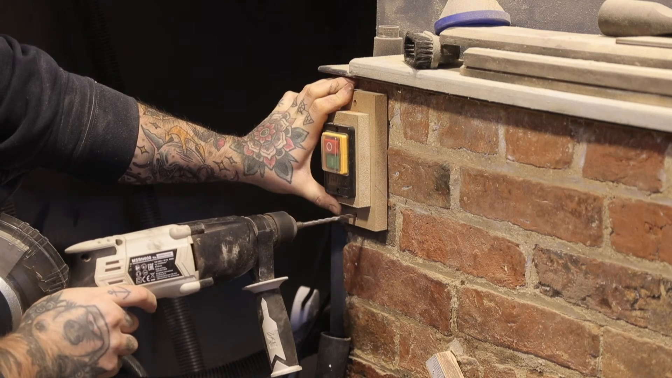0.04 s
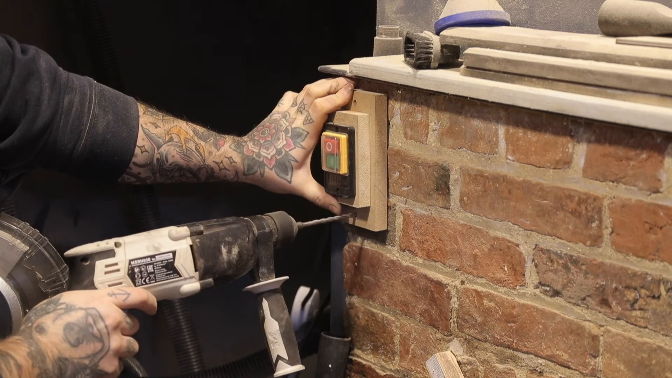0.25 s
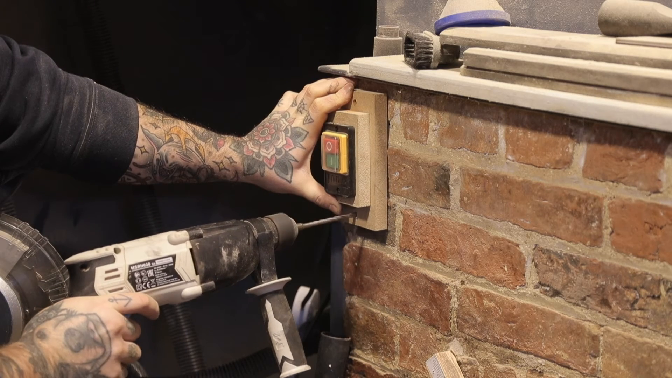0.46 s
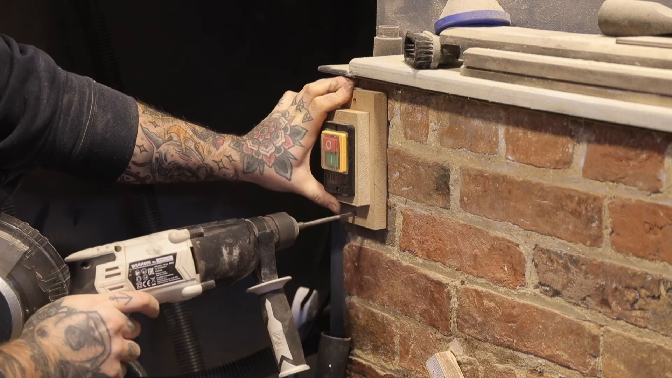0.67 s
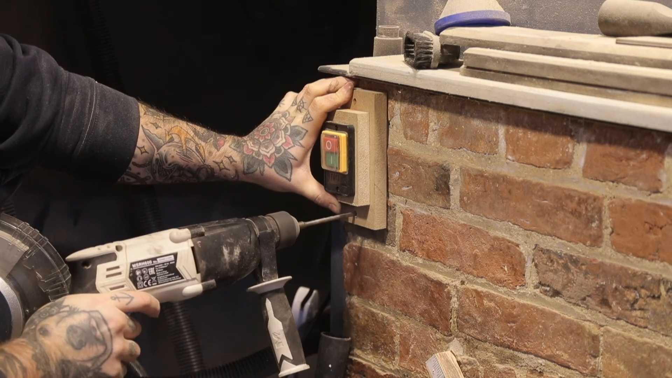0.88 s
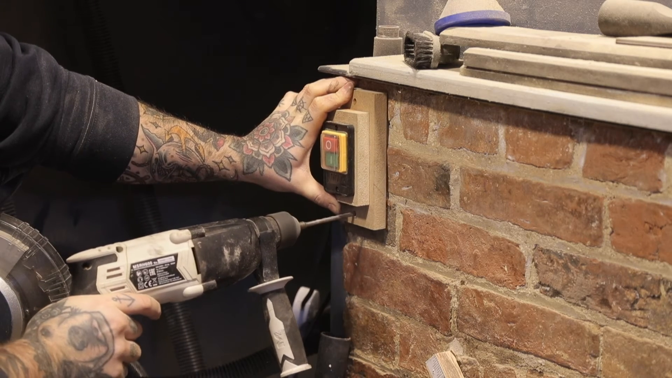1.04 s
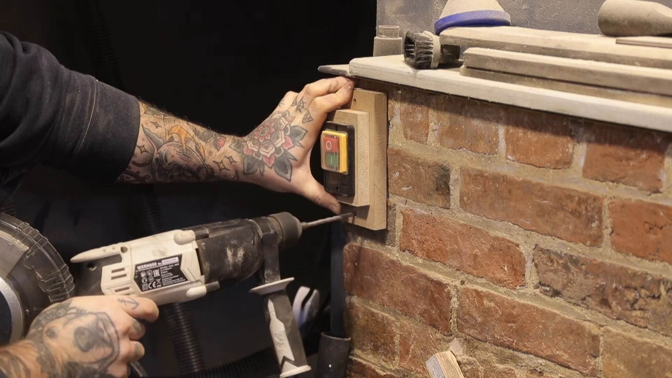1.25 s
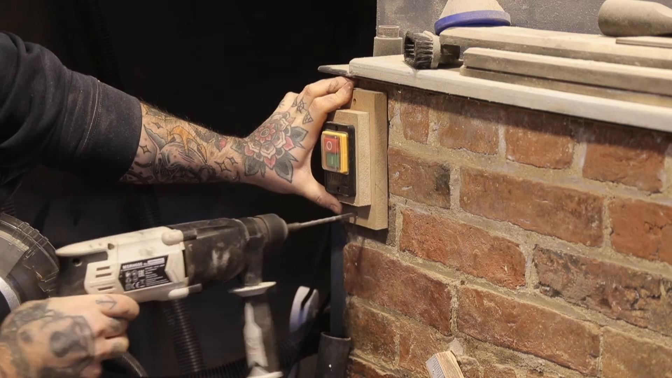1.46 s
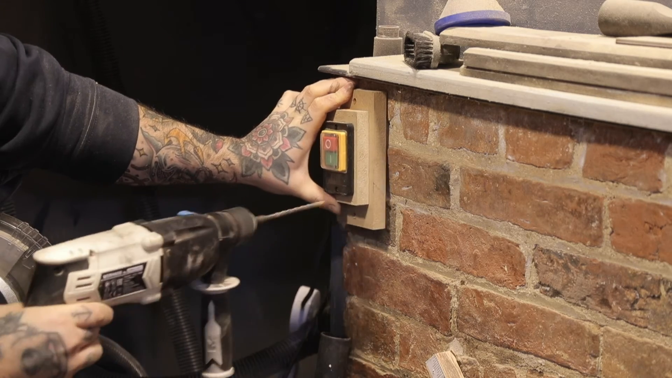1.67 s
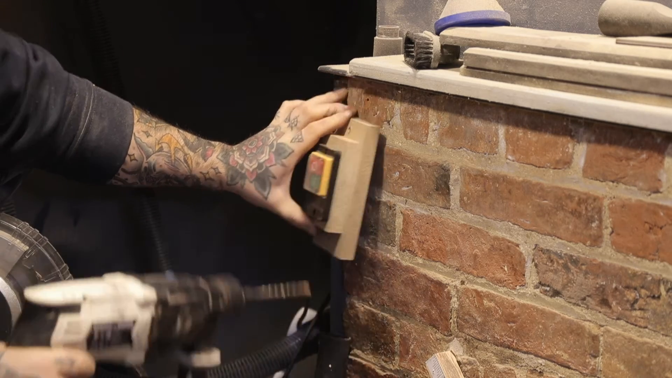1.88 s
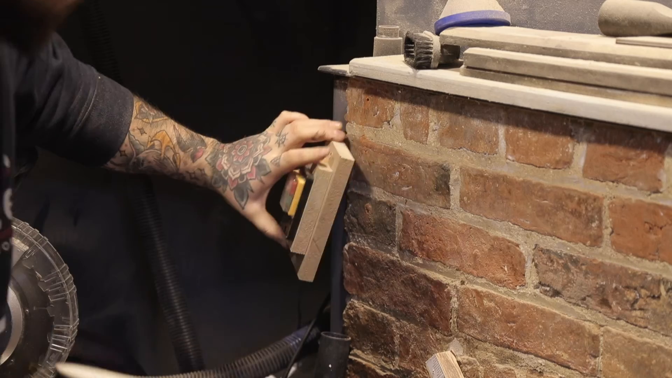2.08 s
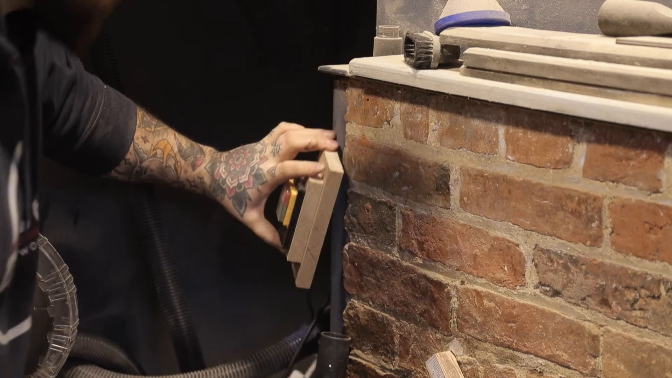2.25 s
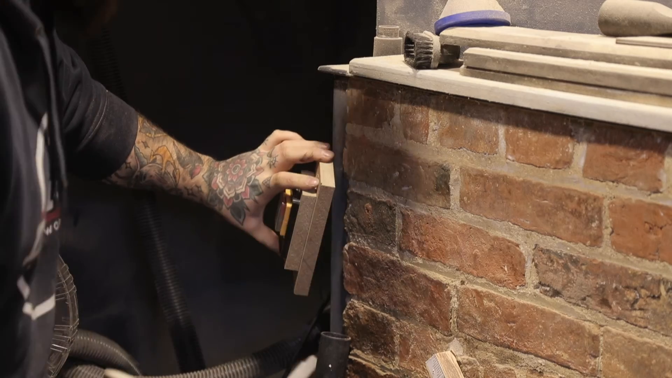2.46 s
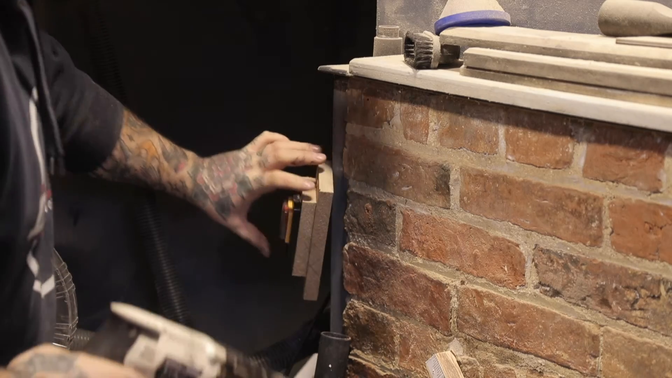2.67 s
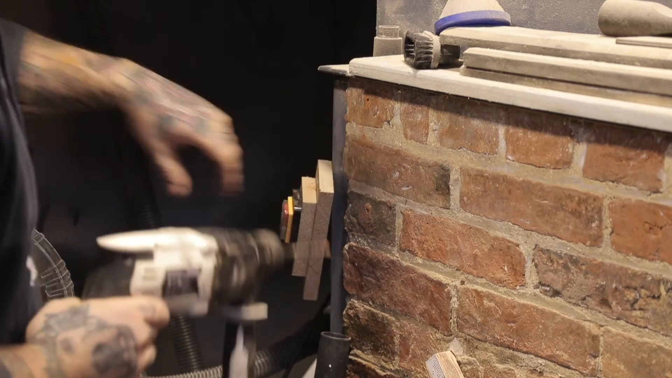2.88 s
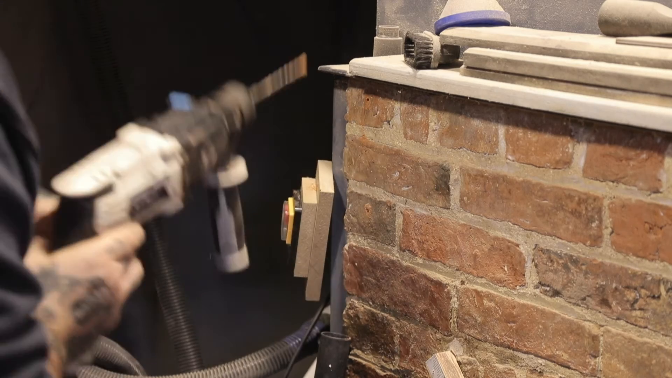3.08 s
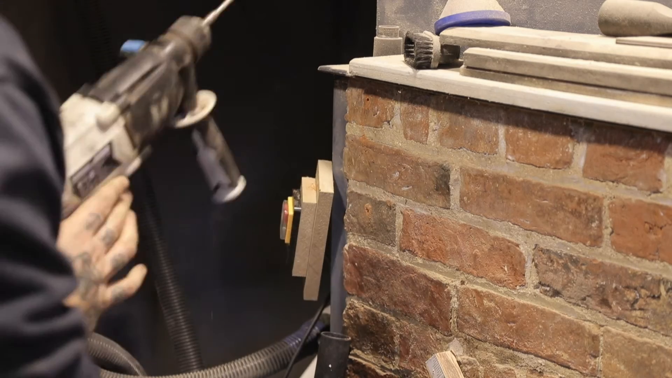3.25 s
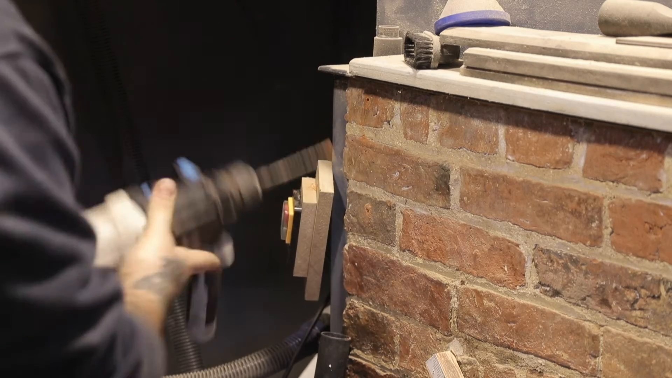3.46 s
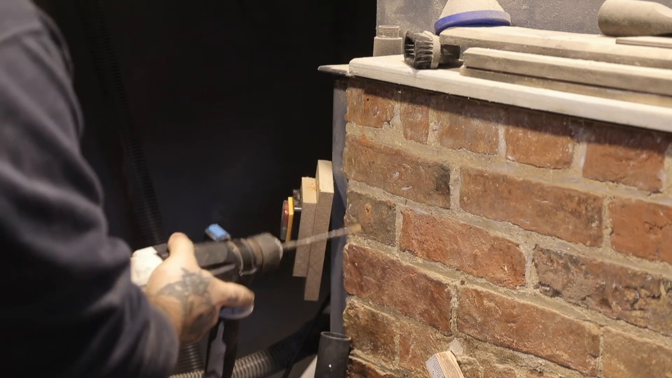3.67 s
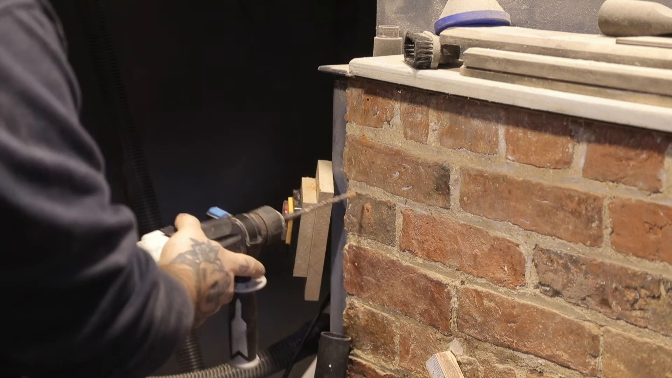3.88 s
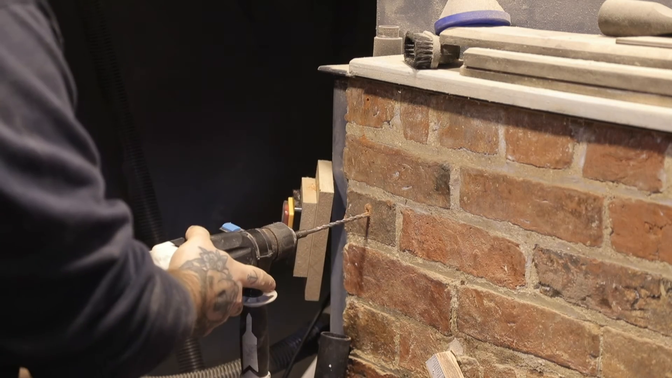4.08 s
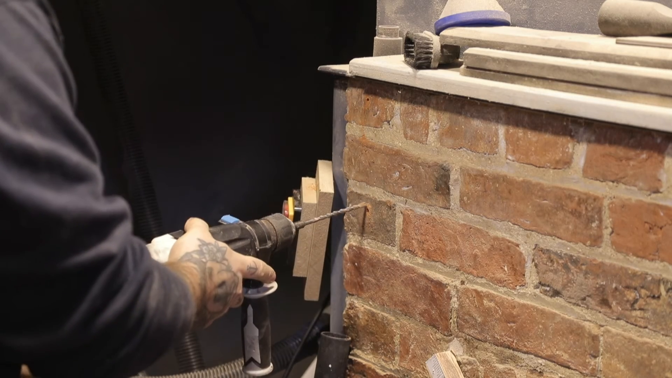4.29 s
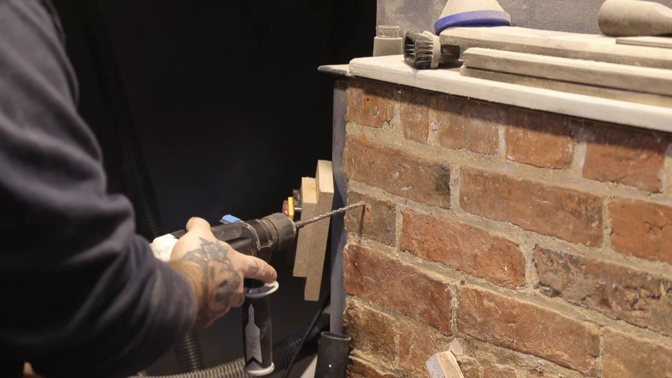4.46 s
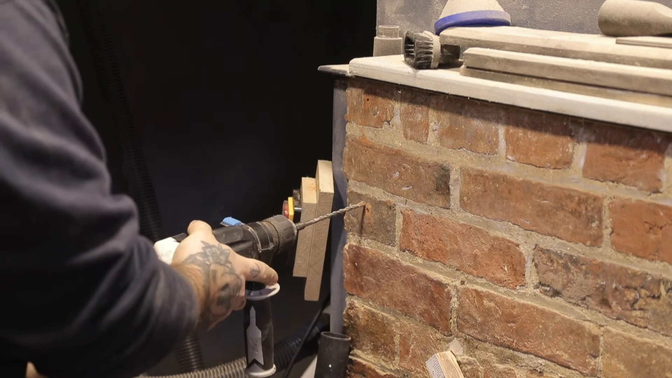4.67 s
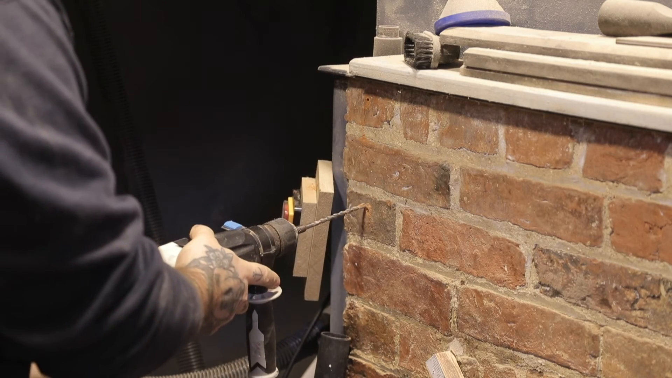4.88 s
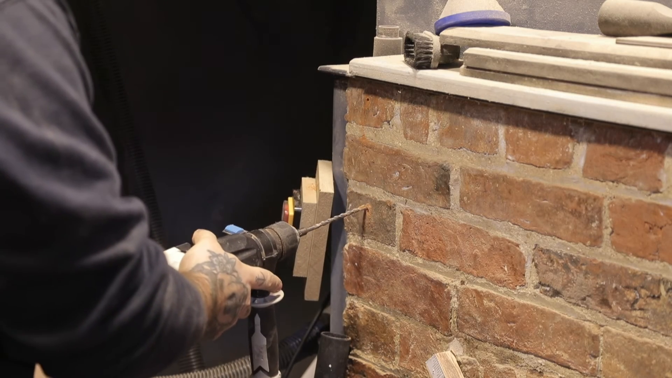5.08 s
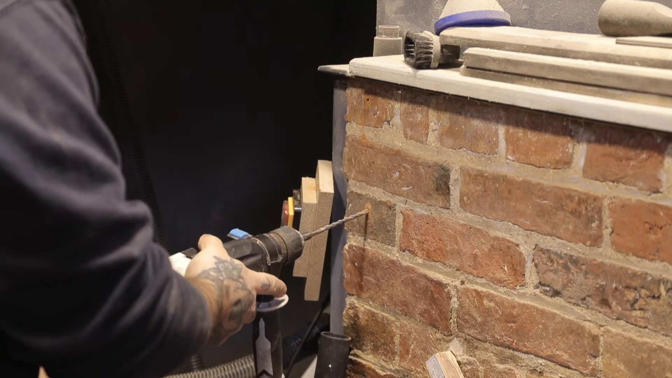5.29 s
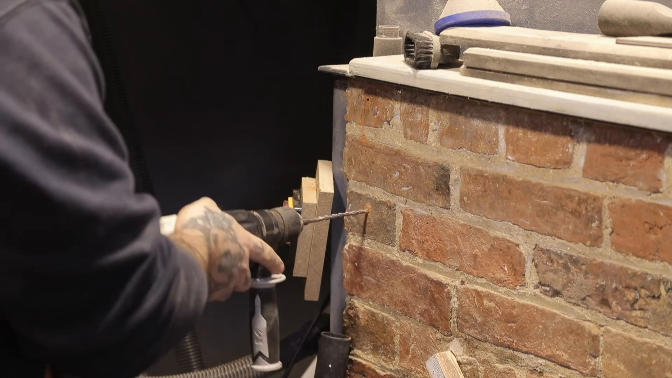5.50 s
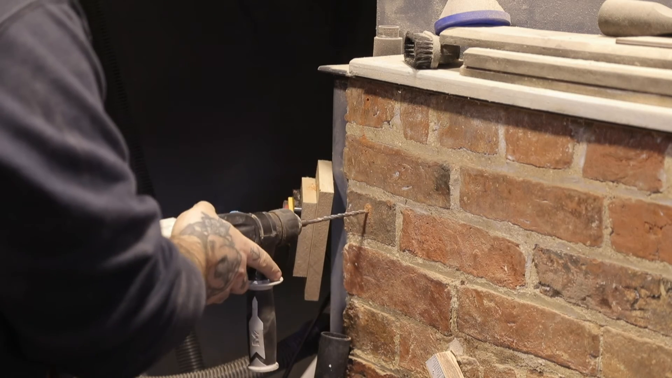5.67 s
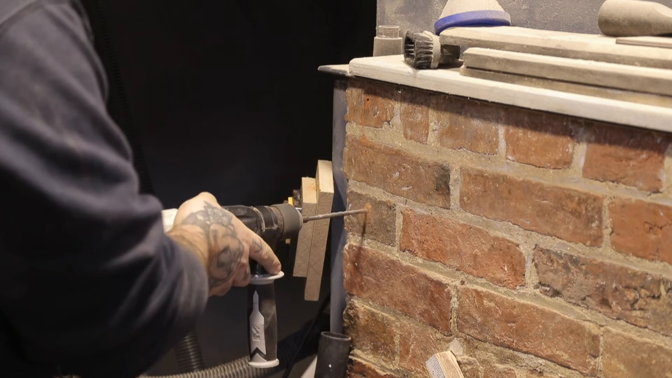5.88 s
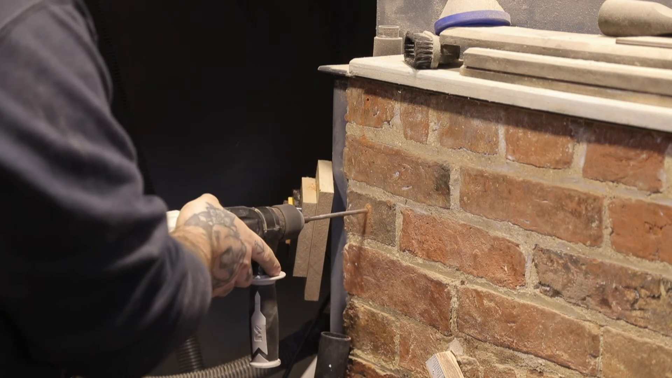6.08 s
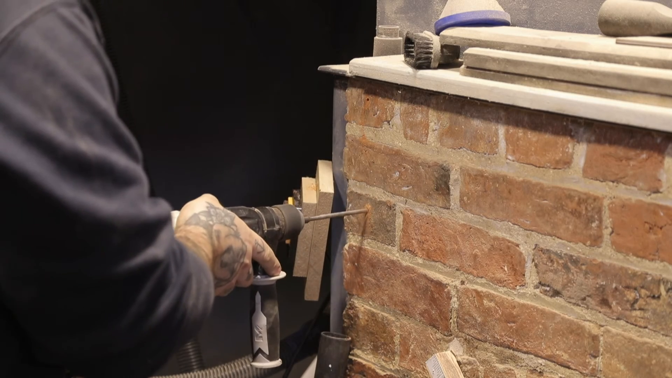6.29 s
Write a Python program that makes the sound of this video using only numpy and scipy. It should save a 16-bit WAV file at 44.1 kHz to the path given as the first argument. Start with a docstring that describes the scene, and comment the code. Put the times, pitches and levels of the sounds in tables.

```python
"""A hammer drill in a small workshop spins up, bores into brick with one piston blow a turn, and coasts down
to clutch ticks. Then a wooden board knocks, the bit taps the wall and sleeves rustle over the room hum, until
a second run starts near the end. Blows are harmonics of the turning rate lifted by wall modes, whines are
phase-locked sines, motor and fan are filtered noise jolted by the piston, and knocks and taps are decaying
modes and noise bands in a reverberant room. Both channels are alike."""
import sys
import numpy as np
from scipy import signal
from scipy.fft import rfft, irfft
from scipy.io import wavfile
from scipy.ndimage import uniform_filter1d

SR = 44100
rng = np.random.default_rng(int(sys.argv[2]) if len(sys.argv) > 2 else 0)


def pcm_store(signal):
    """Save signal as 16-bit PCM."""
    levels = np.round(np.clip(np.atleast_2d(signal), -1, 1) * 32767)
    wavfile.write(sys.argv[1], SR, levels.astype(np.int16).T)


N = 279594
T = np.arange(N) / SR
FULL_SPEED_HZ = 60  # blow rate to which the speed rules refer
ENGAGE_S, LET_GO_S = 0.13, 0.077

# hammer engaged in the brick: start t/s, end t/s, blow level at full speed/dB
HAMMERING = [(0.421, 1.505, -33.5), (5.883, 6.5, -36)]


def undb(db):
    """A level in decibels is twenty times the logarithm of an amplitude ratio."""
    return 10 ** (np.asarray(db) / 20)


def unit(x):
    """Normalises signal power to an rms of 1."""
    return x / np.sqrt(np.mean(x ** 2))


def curve(table):
    """Linear interpolation of one (t/s, value) table at every sample."""
    return np.interp(T, *np.transpose(table))


def span(start, end, attack, release):
    """Linear gate: rises 0 to 1 from the start, holds, falls back after the end."""
    return np.clip(np.minimum((T - start) / attack, 1 - (T - end) / release), 0, 1)


def decay(s, t60, rise=0.00033):
    """Exponential damping: rises from s with time constant rise and falls 60 dB in t60."""
    age = np.clip(T - s, 0, None)
    return (1 - np.exp(-age / rise)) * undb(-60 * age / t60)


def colour(x, points=((20, 0), (20000, 0)), peaks=(), floor_db=-99, size=8192):
    """Minimum-phase filter: a (f/Hz, level/dB) outline times resonances that stand on a floor."""
    hz = np.arange(1, size // 2 + 2) * SR / size
    outline_hz, outline_db = np.transpose(points)
    gain = undb(np.interp(np.log(hz), np.log(outline_hz), outline_db))
    if len(peaks):
        power = sum(undb(db) ** 2 / (1 + (2 * (hz - f) / w) ** 2) for f, w, db in peaks)
        gain = gain * np.sqrt(undb(floor_db) ** 2 + power)
    # folding the cepstrum onto positive time makes the filter causal
    cepstrum = irfft(np.log(gain))
    cepstrum[1:size // 2] *= 2
    cepstrum[size // 2 + 1:] = 0
    return signal.fftconvolve(x, irfft(np.exp(rfft(cepstrum))))[:N]


def band(x, lo_hz, hi_hz):
    """Zero-phase band-pass, so that neighbouring bands add up; rms 1."""
    sos = signal.butter(2, [lo_hz, hi_hz], "bandpass", fs=SR, output="sos")
    return unit(signal.sosfiltfilt(sos, x))


def lift(hz, peaks):
    """Resonant gain met by a tone of moving pitch: Lorentzian peaks added to unity."""
    return 1 + sum(undb(db) / (1 + (2 * (hz - f) / w) ** 2) for f, w, db in peaks)


def grit(spread_db):
    """White noise as dense grains of uneven but bounded size."""
    size = np.minimum(rng.exponential(size=N), 5)
    return rng.standard_normal(N) * undb(spread_db * size)


def walk(rate):
    """Slow random wander: noise smoothed twice over 1/rate seconds, rms 1."""
    k = int(SR / rate)
    return unit(uniform_filter1d(uniform_filter1d(rng.standard_normal(N), k), k))


def hum():
    """Filtered noise: a room hum whose level sinks to a low at 2.4 s and swells back afterwards."""
    # hum spectrum: f/Hz, level/dB
    hum_spectrum = [(26, -45), (45, -10), (109, -19), (205, -8.5), (275, -7), (334, -10.5), (632, -12.5),
                    (714, -11), (1030, -11), (1280, -17.5), (1380, -15.5), (2430, -26), (2880, -28.5),
                    (8240, -45), (15600, -43)]
    # hum level as heard: t/s, level/dB
    hum_level = [(0, -37), (2.4, -70.5), (2.6, -54), (3.0, -50), (4.0, -49.5), (5.0, -51), (5.8, -50),
                 (6.34, -40)]
    return unit(colour(rng.standard_normal(N), hum_spectrum)) * undb(curve(hum_level) + 0.77 * walk(2.6))


def room(x):
    """Diffuse reverberation: direct sound plus a band-limited, exponentially decaying noise tail."""
    t60_s, tail_db = 0.28, -7.5
    tail = (band(rng.standard_normal(N), 85, 10000) * decay(0.0038, t60_s))[:SR // 2]
    tail = tail / np.sqrt(np.sum(tail ** 2))
    return x + undb(tail_db) * signal.fftconvolve(x, tail)[:N]


def rubbing():
    """Friction noise: cloth and the bit dragged over brick are swelling grit, part of which rings."""
    # rustles: peak t/s, swell t60/s, hold/s, fade t60/s, level/dB; dull, bright, ringing parts/dB re it
    rustles = [(2.65, .5, 0.011, 0.85, -54, 2, -19, -5), (2.81, 0.24, 0.068, 0.58, -60, 7, -17, -17),
               (2.934, 0.11, .005, 0.27, -41.5, -2.5, -24, -23),
               (3.142, 0.088, .17, 0.16, -52.5, -1, -9.5, -5), (3.38, 0.35, .01, 0.48, -51, -4, -11, -5),
               (3.506, 0.16, 0.014, 0.22, -41.5, 5.5, -17, -10),
               (3.594, 0.069, .01, 0.57, -45.5, -16, -7.5, -5), (3.79, 0.25, .01, 0.65, -63, 3, -7, 3),
               (4.64, 0.16, 0.15, .5, -69.5, 7, -24, 4), (4.9, .5, .02, 1.0, -63, 2, -29, -1),
               (5.66, 0.36, 0.035, 0.38, -61.5, -8, -10, -6)]
    # resonances of the dull sleeve noise: f/Hz, width/Hz, level/dB
    sleeve = [(940, 200, 0), (1930, 300, -17)]
    # ringing of the scrape: f/Hz, width/Hz, level/dB
    scrape_modes = [(3400, 220, -3), (4830, 140, 1)]
    cloth = grit(1.8) * undb(1.6 * walk(60))
    plain = band(cloth, 1680, 6460)
    bright = band(cloth, 5500, 13500)
    dull = band(colour(cloth, peaks=sleeve, floor_db=1), 680, 2490)
    scrape = unit(colour(grit(2.6), peaks=scrape_modes, floor_db=-58.0))
    out = np.zeros(N)
    for s, swell, hold, fade, db, dull_db, bright_db, scrape_db in rustles:
        swell_db = -60 * np.clip((s - T) / swell, 0, 3)
        fade_db = -60 * np.clip((T - s - hold) / fade, 0, 3)
        parts = plain + undb(dull_db) * dull + undb(bright_db) * bright + undb(scrape_db) * scrape
        out += undb(db + swell_db + fade_db) * parts
    return out


def taps():
    """Impact excitation: each tap is a decaying rattle of noise through the steel bit's resonances."""
    # taps: t/s, middle/dB, bass/dB, treble/dB, rattle t60/s
    tap_events = [(2.344, -38.5, -33, -38, 0.092), (2.495, -46, -48, -54, 0.17),
                  (2.7843, -36, -51, -55, 0.078), (3.1244, -62, -66, -58, 0.069),
                  (3.467, -50, -42, -40, 0.38), (4.0952, -40, -40.5, -43.5, 0.12),
                  (4.1594, -63, -61, -58, 0.06), (4.474, -49, -42, -44, 0.086),
                  (5.2844, -46, -46, -54, 0.11), (5.305, -36.5, -37, -36.5, 0.12),
                  (5.5, -54, -31, -45.5, 0.076), (5.7105, -69, -70, -38, 0.19),
                  (5.8152, -47, -34, -38.5, 0.33)]
    # resonances of the steel bit and chuck: f/Hz, width/Hz, level/dB
    bit_modes = [(350, 114, 6), (880, 100, -2), (1320, 300, -1), (2220, 350, -1), (3020, 230, -11),
                 (3570, 440, -4.5), (4500, 310, -15.5), (4920, 420, -11.5), (6100, 210, -13),
                 (8750, 150, -12)]
    # treble outline of the bit: f/Hz, level/dB
    bit_outline = [(6000, 9), (8000, -3), (15000, 3)]
    steel = colour(grit(2.0), bit_outline, bit_modes, floor_db=-18)
    low, mid, high = band(steel, 127, 1370), band(steel, 640, 1970), band(steel, 1700, 11700)
    out = np.zeros(N)
    for s, mid_db, low_db, high_db, t60 in tap_events:
        parts = undb(mid_db) * mid + undb(low_db) * low + undb(high_db) * high
        out += decay(s, t60, 0.0031) * parts
    return out


def board():
    """Modal synthesis: each knock rings damped modes of the board, blurred by a rattle, over a dull thud."""
    # knocks: t/s, ring peak/dB, thud level/dB
    knocks = [(2.08, -46, -55), (2.294, -36.5, -54), (2.34, -22, -46), (2.496, -31, -42),
              (2.505, -33.5, -60), (2.743, -38.5, -70), (2.77, -41, -73), (3.464, -37.5, -51),
              (5.328, -49, -38.5), (5.537, -52, -40), (5.553, -55, -67)]
    # modes of the wooden board: f/Hz, level/dB, t60/s
    modes = [(213, -6, 0.05), (290, -1, .045), (360, 2, .045), (426, 6, 0.045), (507, 8, 0.045),
             (622, 5, 0.035), (870, -14, .03), (1260, -20, .03)]
    level_scatter_db, pitch_scatter = 2.5, 0.062  # from knock to knock; pitch as a fraction
    rattle = band(rng.standard_normal(N), 200, 530)
    rumble = band(rng.standard_normal(N), 53, 140)
    out = np.zeros(N)
    for s, db, thud_db in knocks:
        age = T - s
        ring = np.zeros(N)
        for f, mode_db, t60 in modes:
            a, b = rng.standard_normal(2)
            tone = np.sin(2 * np.pi * f * (1 + pitch_scatter * b) * age)
            ring += undb(mode_db + level_scatter_db * a) * tone * decay(s, t60, 0.0034)
        blur = undb(-13) * rattle * decay(s, .1, 0.0044)
        thud = (np.sin(2 * np.pi * 75 * age) + 0.48 * rumble) * decay(s, 0.25, 0.0055)
        out += undb(db) * (ring / np.abs(ring).max() + blur) + undb(thud_db) * thud
    return out


def clutch():
    """Impulsive noise: short bright ticks of the clutch while the motor coasts."""
    # ticks: t/s, level/dB
    ticks = [(1.5788, -29), (1.694, -27), (1.727, -29), (1.7545, -19), (1.811, -13), (1.8402, -15),
             (1.911, -18), (1.9516, -16.5), (1.9968, -19), (2.049, -20.5), (2.0816, -28), (2.115, -26),
             (2.1574, -30), (2.1999, -32)]
    return band(grit(1.3), 2900, 7800) * sum(undb(db) * decay(s, 0.011, 0.00045) for s, db in ticks)


def speed_gain(rule, hz, engaged):
    """Power law in speed: (dB at full speed, dB per doubling of speed, dB gained while hammering)."""
    full_db, doubling_db, hammering_db = rule
    return undb(full_db + doubling_db * np.log2(hz / FULL_SPEED_HZ) + hammering_db * engaged)


def loose_parts(turns, jolt, engaged):
    """Amplitude modulation: piston jolts shape grit, and part of it repeats with every turn in the brick."""
    rattle = jolt * grit(2.7) * undb(1.1 * walk(13))
    # three frozen clatters of one turn each, slowly trading places
    place = (turns % 1 * 512).astype(int)
    alike = sum(walk(1.53) * row[place] for row in rng.standard_normal((3, 512)))
    alike = alike * np.exp(-(turns % 1) / 1.3)
    return unit(rattle) + undb(-3) * engaged * unit(alike)


def motor_clatter(rattle, hz, engaged):
    """Source and filter: the rattle of loose parts excites the housing, with a second set of modes later."""
    # motor spectrum: f/Hz, level/dB
    motor_outline = [(290, -45.5), (500, -7), (666, -6), (813, -0.5), (1160, -1), (1250, -3.5), (1740, -2),
                     (2170, -1.5), (3020, -1.5), (3570, -0.5), (7000, -4.5), (9100, -54.5), (15400, -120)]
    # housing modes in the first run: f/Hz, width/Hz, level/dB
    housing_first = [(1344, 190, 3.5), (2100, 410, 1), (4740, 290, -3.5), (5720, 50, 16)]
    # housing modes at the end of the coast and in the second run: f/Hz, width/Hz, level/dB
    housing_later = [(1450, 380, -6.5), (2162, 270, -6), (2670, 260, -2.5), (3500, 180, -8),
                     (5100, 200, -6), (5800, 200, -13)]
    # speed rule of the upper clatter: full speed/dB, per doubling/dB, hammering/dB
    edge_rule = (-1.5, 1.67, -1.9)
    # speed rule of the low growl: full speed/dB, per doubling/dB, hammering/dB
    growl_rule = (-5, 2.24, 0.34)
    later = np.clip((T - 1.9) / .3, 0, 1)  # crossfade to the second set during the coast
    first_sound = unit(colour(rattle, motor_outline, housing_first, floor_db=0.5))
    later_sound = unit(colour(rattle, motor_outline, housing_later, floor_db=-9.5))
    clatter = (1 - later) * first_sound + later * later_sound
    middle = .8 * band(clatter, 1840, 4120)
    edge = 0.53 * speed_gain(edge_rule, hz, engaged) * band(clatter, 3915, 5480)
    growl = speed_gain(growl_rule, hz, engaged) * undb(0.4 * walk(15)) * band(clatter, 640, 1800)
    return middle + edge + growl


def fan_hiss(jolt, hz, engaged):
    """Broadband flow noise rising with speed, pulsed by the jolts and by dense short bursts of chips."""
    # fan spectrum: f/Hz, level/dB
    fan_outline = [(3240, -31.5), (5500, -6.5), (6180, -2), (7730, -10.5), (14000, -17.5)]
    # speed rule of the hiss: full speed/dB, per doubling/dB, hammering/dB
    fan_rule = (-5, 3.66, -1.5)
    # speed rule of its treble: full speed/dB, per doubling/dB, hammering/dB
    top_rule = (-22.5, 4.6, 7.3)
    starts = (rng.random(N) < 45 / SR) * rng.exponential(size=N)  # about 45 a second
    chips = signal.lfilter([1], [1, -.993], starts)
    air = colour((jolt + 0.44 * chips) * grit(1.1) * undb(0.41 * walk(30)), fan_outline)
    hiss = speed_gain(fan_rule, hz, engaged) * band(air, 3300, 9700)
    return hiss + speed_gain(top_rule, hz, engaged) * band(air, 9500, 18000)


def grinding(jolt, hz, engaged):
    """Low-frequency friction noise, modulated by the piston's jolts."""
    # grinding spectrum: f/Hz, level/dB
    grind_outline = [(60, -39), (150, -19), (300, -3), (500, 2.5), (900, -3.5), (1500, -5), (3000, -26)]
    # speed rule: full speed/dB, per doubling/dB, hammering/dB
    grind_rule = (-16, 0.96, 1.7)
    noise = unit(colour(jolt * grit(0.7), grind_outline))
    return noise * speed_gain(grind_rule, hz, engaged) * undb(0.9 * walk(12))


def whines(turns, hz, jolt, engaged, driven):
    """Gear mesh and commutator tones at fixed multiples of the blow rate, swept through gearbox resonances."""
    # gearbox resonances: f/Hz, width/Hz, level/dB above the rest
    gearbox = [(2300, 1000, 9), (3674, 820, 2.5), (4624, 170, 5.5), (5020, 150, 12.5)]
    # speed rule of the gear mesh: full speed/dB, per doubling/dB, hammering/dB
    gear_rule = (-18, 0.1, 1.5)
    # speed rule of the commutator: full speed/dB, per doubling/dB, hammering/dB
    commutator_rule = (-24.5, -4, -3)
    strain_db_per_hz_s = -0.1023  # whines sink while the motor gains speed against the blows
    # the teeth chatter more at low speed
    slack_rad = 0.53 + .4 * np.clip(1 - hz / FULL_SPEED_HZ, 0, 1)
    out = np.zeros(N)
    for multiple, rule in ((74.3, gear_rule), (110, commutator_rule)):
        tone = np.sin(2 * np.pi * multiple * turns + slack_rad * walk(250))
        gain = speed_gain(rule, hz, engaged) * lift(multiple * hz, gearbox)
        out += gain * jolt * undb(4.0 * walk(45)) * tone
    gaining = np.clip(uniform_filter1d(np.gradient(hz) * SR, size=2000), 0, 100)
    trigger_db = driven - 1.5  # 1 dB weaker once the trigger is let go
    load_db = strain_db_per_hz_s * gaining * engaged
    return out * undb(trigger_db + load_db) * np.clip(hz / 17, 0, 1) ** 4


def shaft_hum(turns):
    """Rotation tones of armature and second shaft while the bit leans on the board before hammering."""
    # hum: start t/s, end t/s, level/dB
    leaning = (0.12, .43, -40)
    start, end, db = leaning
    armature = np.sin(2 * np.pi * 5.0 * turns)
    second_shaft = 1.1 * np.sin(2 * np.pi * 6.9 * turns)
    return undb(db) * span(start, end, 0.16, 0.074) ** 3 * (armature + second_shaft)


def blows(turns, hz):
    """Fourier series: a ring repeated every blow sounds as harmonics of the blow rate, lifted by wall modes."""
    # ring in the wall at the first hole: multiple of the blow rate, level/dB
    hole_1 = [(1, -18), (2, -22), (3, -11), (4, -5.5), (5, -8.5), (6, -7.5), (7, -6), (8, -19), (9, -6),
              (10, -5), (11, -10), (12, -21), (13, -31), (14, -6), (15, -3), (16, -12), (17, -15), (18, -2),
              (19, -4.5), (20, -18), (21, -20), (22, -11.5), (23, -0.5), (24, -6), (25, -2), (26, -15)]
    # ring in the wall at the second hole: multiple of the blow rate, level/dB
    hole_2 = [(1, -15.5), (2, -9), (3, 0.5), (4, -8.5), (5, -4.5), (6, -3.5), (7, -3), (8, -4), (9, -6),
              (10, 0), (11, -6), (12, -9), (13, -19), (14, 2), (15, -18), (16, -12), (17, -7), (18, -9),
              (19, 0), (20, -2), (21, -1), (22, -6), (23, -18), (24, -20), (25, 3.5), (26, -18)]
    # wall modes: f/Hz, width/Hz, level/dB above the rest
    wall = [(210, 7.5, 11), (319, 37, 12.5), (428, 26, 7.5), (485, 30, 6.5), (629, 37, 6.5),
            (1383, 92, 3.5)]
    out = np.zeros(N)
    for (k, first_db), (_, second_db) in zip(hole_1, hole_2):
        # higher multiples waver more from blow to blow
        phase = 2 * np.pi * (k * turns + rng.random()) + 0.0066 * k * walk(29.83)
        wave = np.sin(phase) * undb(1.4 * walk(12.0))
        out += undb(np.where(T < 4, first_db, second_db)) * lift(k * hz, wall) * wave
    return out


def hammer(turns, hz, jolt):
    """Periodic impact: blows ring the wall and the struck bit sings in a narrow high band."""
    strength = sum(undb(db) * span(a, b, ENGAGE_S, LET_GO_S) ** 2 for a, b, db in HAMMERING)
    strength = strength * (hz / FULL_SPEED_HZ) ** 0.74
    shank = band(jolt ** 2 * grit(3.0), 14550, 15150) * undb(3 * walk(40))
    return strength * (blows(turns, hz) + undb(-38) * shank)


def drill():
    """Phase locking: one integrated shaft speed drives blows, clatter, fan, grinding and whines."""
    # shaft speed: t/s, piston blow rate f/Hz
    speed = [(0, 17), (.05, 19), (.15, 24.8), (.22, 27.3), (.42, 32.3), (.5, 39), (.596, 50.4),
             (.726, 56.7), (.79, 58.4), (.936, 60.7), (1.09, 60.9), (1.32, 60.4), (1.5, 63), (1.54, 55),
             (1.65, 47), (1.8, 34.5), (2.04, 19), (2.4, 6), (5.88, 8), (5.98, 48), (6.01, 49), (6.11, 65),
             (6.19, 70.8), (6.34, 74.2)]
    # motor level over both runs: t/s, level/dB
    motor_level = [(0, -23), (.06, -18.5), (.15, -16), (.36, -18), (.5, -17), (.67, -21.5), (1.07, -22),
                   (1.42, -22.5), (1.49, -21), (1.57, -23), (1.93, -28), (2.15, -35), (2.31, -41.5),
                   (2.38, -51.5), (2.6, -78), (5.8, -86), (5.85, -52), (5.88, -38), (5.958, -14.5),
                   (6.01, -18.5), (6.25, -22.5), (6.34, -22)]
    # trigger held: start t/s, end t/s
    trigger_held = [(0, 1.46), (5.9, 6.5)]
    # bit rattling in the hole as it is drawn back: start t/s, end t/s, level/dB re the motor
    withdraw = (1.37, 1.513, -11.5)
    hz = curve(speed)
    turns = np.cumsum(hz * (1 + .002 * walk(25))) / SR
    engaged = sum(span(a, b, ENGAGE_S, LET_GO_S) for a, b, _ in HAMMERING)
    driven = sum(span(a, b, 0.033, LET_GO_S) for a, b in trigger_held)
    # the piston jolts the loose parts twice a turn, the forward stroke harder
    jolt = 1 + .5 * np.exp(-(turns % 1) / 0.057) + 0.38 * np.exp(-(2 * turns % 1) / 0.23)
    rattle = loose_parts(turns, jolt, engaged)
    # the housing drums on the board while the motor is driven
    drum = driven * band(rattle, 256, 520) * undb(-20)
    start, end, back_db = withdraw
    back = span(start, end, 0.02, 0.019)
    hole_rattle = back * undb(back_db + 3.1 * walk(30)) * band(rattle, 960, 1010)
    machine = motor_clatter(rattle, hz, engaged) + drum + hole_rattle
    machine = machine + fan_hiss(jolt, hz, engaged) + grinding(jolt, hz, engaged)
    machine = machine + whines(turns, hz, jolt, engaged, driven)
    # the blows ease by 5 dB while the bit is drawn back
    struck = hammer(turns, hz, jolt) * undb(-5 * back)
    return struck + shaft_hum(turns) + undb(curve(motor_level)) * machine


def scene():
    """Superposition: the sources add, and only taps, knocks and ticks excite the room's tail."""
    mono = hum() + rubbing() + room(taps() + board() + clutch()) + drill()
    return np.array([mono, mono])


def record(dry):
    """Band limiting and saturation: the deepest bass is dropped, peaks are rounded and the top is cut."""
    dry = signal.sosfilt(signal.butter(4, 48, "highpass", fs=SR, output="sos"), dry)
    rounded = np.tanh(.8 * dry) / .8
    return signal.sosfilt(signal.ellip(12, .2, 80, 15700, fs=SR, output="sos"), rounded)


dry = scene()
out = record(dry)
pcm_store(out)
```